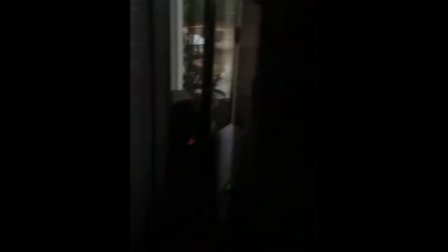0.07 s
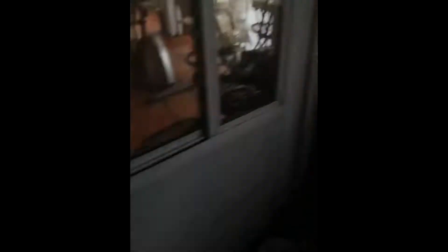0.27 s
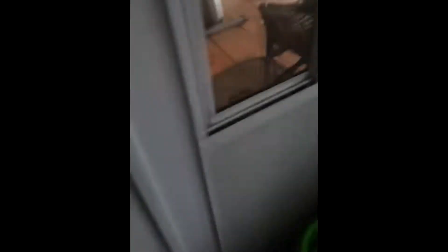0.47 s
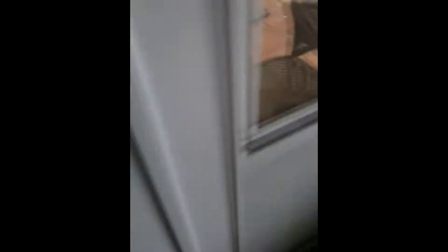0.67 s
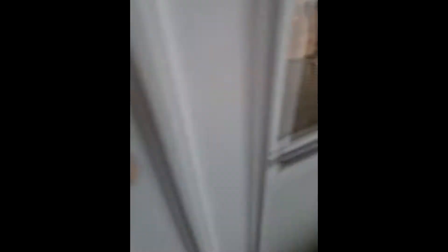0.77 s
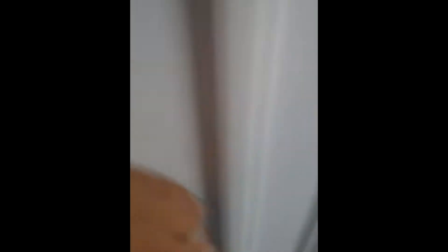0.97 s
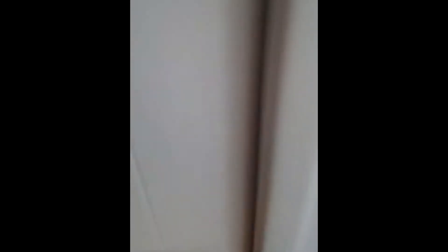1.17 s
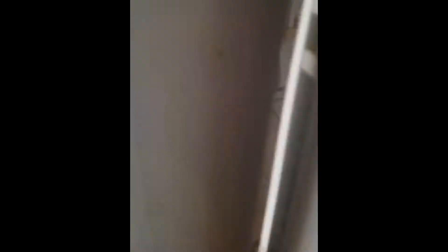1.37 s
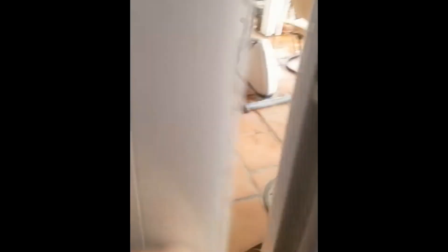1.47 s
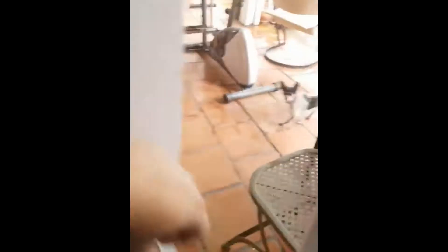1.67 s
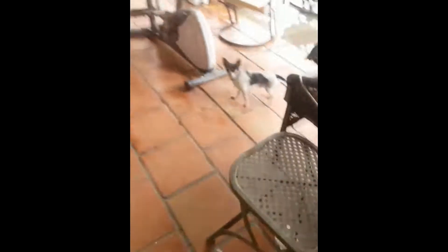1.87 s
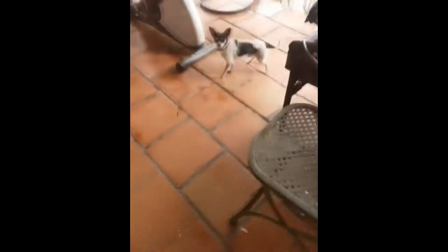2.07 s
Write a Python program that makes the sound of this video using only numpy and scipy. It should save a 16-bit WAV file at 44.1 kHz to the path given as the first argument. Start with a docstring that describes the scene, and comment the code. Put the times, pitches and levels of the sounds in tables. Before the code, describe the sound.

Sliding glass door rattles, knocks loose and scrapes open, air thumping the close phone microphone

```python
"""A faint room tone and low rumble come first, with one soft puff; both rumble and tone last throughout.
Light clicks of a door's metal latch (filtered chatter plus decaying modes) follow, then knocks in the leaf.
The knocks peak near 1 s as the door frees and slides off with a scrape (shaped noise) and louder rumble.
Puffs of displaced air (short pressure swings trailing noisy eddies) then thump the microphone of a phone.
Sparse clicks and knocks follow, and a last soft puff; a small room answers every click and knock."""
import sys
import numpy as np
from scipy import signal
from scipy.fft import rfft, irfft, next_fast_len
from scipy.io import wavfile
from scipy.ndimage import map_coordinates

SR = 44100
rng = np.random.default_rng(int(sys.argv[2]) if len(sys.argv) > 2 else 0)


def unload_audio(sound):
    """Save the sound as a 16-bit wav file, at the path given as the first command line argument."""
    columns = np.transpose(np.atleast_2d(sound))
    # keep every value between -1 and 1, then stretch to whole-number steps
    steps = np.round(np.clip(columns, -1, 1) * 32767)
    wavfile.write(sys.argv[1], SR, steps.astype(np.int16))


N = 92874
TIME_S = np.arange(N) / SR


def amp(db):
    """Level law: 20 dB is a factor of ten in amplitude."""
    return 10 ** (np.asarray(db) / 20)


def along(points, hz):
    """Logarithmic frequency scale: interpolate (hz, value) points along it."""
    point_hz, value = np.transpose(points)
    return np.interp(np.log(hz + 1), np.log(point_hz + 1), value)


def closed(points, hz):
    """Band limitation: a spectrum in dB that falls 14 dB per octave beyond its end points."""
    octaves_below = np.log2(np.maximum(points[0][0] / (hz + 1), 1))
    octaves_above = np.log2(np.maximum((hz + 1) / points[-1][0], 1))
    return along(points, hz) - 14 * (octaves_below + octaves_above)


def curves(rows):
    """Level envelopes: one value per sample for each column after the time."""
    point_s, *columns = np.transpose(rows)
    return [np.interp(TIME_S, point_s, column) for column in columns]


def wobble(rate):
    """Slow random modulation: a smooth curve through `rate` random knots a second."""
    knots = rng.standard_normal(int(N * rate / SR) + 4)
    return map_coordinates(knots, [np.arange(N) * rate / SR])


def coloured(x, db_of_hz):
    """Minimum-phase filtering: folding the cepstrum makes the wanted gain causal."""
    size = next_fast_len(2 * len(x))
    gain = amp(db_of_hz(np.fft.rfftfreq(size, 1 / SR)))
    cepstrum = irfft(np.log(gain + 1e-6), size)
    cepstrum[1:size // 2] *= 2
    cepstrum[size // 2 + 1:] = 0
    return irfft(rfft(x, size) * np.exp(rfft(cepstrum)), size)[:len(x)]


def rush(tone, lumpy_db, rate):
    """Turbulent or frictional noise: random pressure in uneven lumps, coloured and set to rms 1."""
    lumps = rng.standard_normal(N) * amp(lumpy_db * wobble(rate))
    noise = coloured(lumps, lambda hz: closed(tone, hz))
    return noise / np.sqrt(np.mean(noise ** 2) + 1e-20)


# spectrum of the quiet room tone: pitch_hz [Hz], density_db [relative dB per Hz]
HUM_TONE = [(150, -30), (250, -17), (321, -24.5), (522, -13), (632, -20), (927, -7.5), (1030, -20),
            (1460, -13), (1650, -28), (1770, -3), (1930, -4.5), (2020, -14.5), (8430, -35), (11000, -71.5),
            (18500, -120)]


def room_hum():
    """Stationary background noise: a quiet coloured hiss and hum at a steady mean level."""
    return amp(-64.5) * rush(HUM_TONE, lumpy_db=1.6, rate=16)


# reverberation of the small room: pitch_hz [Hz], t60_s [s]
ROOM_DECAY = [(200, 0.3), (1000, 0.52), (4000, 0.14), (8000, 0.18)]


def room(x):
    """Reverberation: each frequency of a diffuse noise tail dies at its own speed."""
    hz, t, bands = signal.stft(rng.standard_normal(SR // 2), SR, nperseg=256)
    decay = amp(-60 * t / along(ROOM_DECAY, hz)[:, None])
    tail = signal.istft(bands * decay, SR, nperseg=256)[1]
    delayed = np.pad(x, (200, 0))  # samples before the first reflection
    return signal.fftconvolve(delayed, tail / np.linalg.norm(tail))[:N]


# puffs of air on the microphone: centre_s [s], level_db [dB, of the swing before its envelope],
# length_ms [ms, one full swing]
PUFFS = [(0.129, -39, 15), (1.236, -18, 3.5), (1.2886, -1.5, 4.6), (1.297, -3, 2.24), (1.303, -7, 3),
         (1.3072, -2.5, 4.6), (1.314, -2.5, 2.5), (1.326, -10, 3), (1.3292, -9, 6.7), (1.346, -8, 3),
         (1.351, -9, 5.2), (1.369, -11, 8.1), (1.377, -12.5, 7), (1.398, -13.5, 6.3), (1.556, -12, 6.8),
         (1.565, -14, 7.9), (1.599, -17.5, 8.8), (1.61, -15.5, 3.6), (1.62, -27, 3.3), (1.647, -22, 4.4),
         (2.079, -32.5, 14.6)]
# spectrum of the eddies behind a puff: pitch_hz [Hz], density_db [relative dB per Hz]
SWIRL_TONE = [(60, -32), (150, 10), (350, -3.5), (800, -11.5), (1500, -14.5), (3000, -53)]


def puffs():
    """Air displacement: each puff pushes the diaphragm, pulls it back and sheds turbulent eddies."""
    swirl_db = -18  # relative to the level of the puff
    swirl_lengths = 0.71  # decay constant of the eddies' power, in puff lengths
    rebound = 1.79  # stretches the dying side of the envelope
    push, eddy_power = np.zeros(N), np.zeros(N)
    for centre_s, level_db, length_ms in PUFFS:
        u = (TIME_S - centre_s) / (length_ms / 1000)  # time in puff lengths
        width = np.where(u < -0.2, 0.3, 0.29 * rebound)
        envelope = np.exp(-abs((u + 0.2) / width) ** 1.57)
        push -= amp(level_db) * np.sin(2 * np.pi * u) * envelope
        eddy_power += amp(2 * level_db) * np.clip(u + 0.5, 0, 1) * np.exp(-abs(u) / swirl_lengths)
    return push + amp(swirl_db) * np.sqrt(eddy_power) * rush(SWIRL_TONE, lumpy_db=6.4, rate=150)


# rubbing noise before the 2.5 dB cut of the scrape: time_s [s], scrape_db [dB], treble_hiss_db [dB]
SCRAPE = [(0.27, -75, -107), (0.29, -55.5, -81), (0.354, -45.5, -67.5), (0.446, -56, -65),
          (0.496, -49.5, -70), (0.642, -53, -68.5), (0.865, -54, -85), (0.99, -32, -59), (1.03, -28, -48),
          (1.132, -45.5, -68.5), (1.322, -43.5, -64.5), (1.418, -43, -60), (1.5, -41, -54.5),
          (1.57, -38, -56.5), (1.786, -54, -64), (2.08, -51, -68)]
# low rolling noise before its 2 dB cut: time_s [s], level_db [dB]
RUMBLE = [(0.14, -56), (0.194, -58.5), (0.516, -52), (0.62, -59), (0.646, -42), (0.7, -55.5), (0.81, -56.5),
          (0.95, -50), (1.04, -35), (1.088, -29), (1.166, -35), (1.214, -39), (1.236, -27), (1.264, -33.5),
          (1.28, -25.5), (1.295, -14), (1.384, -30), (1.428, -35.5), (1.526, -33), (1.558, -31.5),
          (1.624, -28.5), (1.712, -44.5), (1.82, -41), (1.914, -47), (2.1, -52.5)]
# their three spectra: pitch_hz [Hz], density_db [relative dB per Hz]
SCRAPE_TONE = [(150, -24), (250, -6.5), (451, -11.5), (498, -33), (572, -6), (624, -10), (726, -17.5),
               (1680, -16), (5000, -29.5), (6500, -52.5), (11000, -120)]
HISS_TONE = [(2500, 3.1), (4500, 9), (7000, 14), (8600, 5)]
RUMBLE_TONE = [(12, -54), (20, 1), (60, 1.5), (135, 7), (238, 1), (288, -12.5), (414, -18.5), (474, -15.5),
               (500, -4.5), (650, -25.5), (1100, -120)]


def slide():
    """Sliding and rolling friction of hand, seal and rollers: a scrape, its treble hiss and a low rumble."""
    scrape_db, hiss_db = curves(SCRAPE)
    rumble_db, = curves(RUMBLE)
    touch = np.clip((TIME_S - 0.25) / 0.03, 0, 1)  # rubbing fades in
    scrape = amp(scrape_db - 2.5) * rush(SCRAPE_TONE, lumpy_db=2.6, rate=120)
    hiss = amp(hiss_db) * rush(HISS_TONE, lumpy_db=2.6, rate=190)
    rumble = amp(rumble_db - 2) * rush(RUMBLE_TONE, lumpy_db=0.47, rate=40.6)
    return touch * (scrape + hiss) + rumble


def strikes(rows, modes, body, pivot_hz, ring_db, crack_db, grain_db):
    """Impact excitation: each blow is a crack, grainy chatter in the body's colour, and ringing modes."""
    favour_db, favour_oct = 11, 0.22  # the spot struck favours the band round one pitch
    out, t = np.zeros(N + SR), np.arange(SR // 4) / SR
    mode_hz, mode_db, mode_t60 = np.transpose(modes)
    for start_s, level_db, tilt, t60, spot_hz in rows:
        def lean(hz):
            favoured = np.exp(-(np.log2((hz + 1) / spot_hz) / favour_oct) ** 2)
            return tilt * np.log2((hz + 50) / pivot_hz) + favour_db * favoured

        noise = rng.standard_normal(len(t))
        noise[0] += amp(crack_db)
        grain = np.repeat(rng.standard_normal(len(t) // 32 + 1), 32)[:len(t)]
        onset_db = 7.15 * np.exp(-t / 0.0025)
        envelope = amp(-60 * t / t60 + onset_db + grain_db * grain)
        chatter = coloured(noise * envelope, lambda hz: closed(body, hz) + lean(hz))

        # every blow varies the modes; a short blow also shortens their ringing
        level_pick, pitch_pick = rng.standard_normal((2, len(mode_hz)))
        life = np.minimum(mode_t60, 2.22 * t60) * amp(1.5 * pitch_pick)
        mode_amp = amp(mode_db + lean(mode_hz) + 3 * level_pick)
        ring_hz = mode_hz * (1 + 0.006 * pitch_pick)
        decay = amp(-60 * t / life[:, None])
        ring = (mode_amp[:, None] * decay * np.sin(2 * np.pi * ring_hz[:, None] * t)).sum(0)

        hit = chatter / abs(chatter).max() + amp(ring_db) * ring / abs(ring).max()
        out[round(start_s * SR):][:len(t)] += amp(level_db) * hit / abs(hit).max()
    return out[:N]


# knocks in the door leaf: start_s [s], level_db [peak dB], tilt [dB per octave],
# t60_s [s, chatter], pitch_hz [Hz, favoured]
KNOCKS = [(.305,-32.5,4,0.22,1940), (.311,-29,2.5,0.34,834), (.326,-30.5,1.5,0.1,1130),
          (.343,-28,1,0.17,1000), (.421,-33,-5,0.17,860), (.457,-34.5,1,0.081,840),
          (.4965,-32,-7.5,0.095,540), (.508,-40.5,1.5,0.11,850), (.535,-33.5,3.5,0.23,800),
          (.65,-38,-3.5,0.16,292), (.822,-34,3,0.42,530), (.88,-27.5,-1.5,0.29,794),
          (.926,-25.5,-1.5,.14,810), (.947,-18.5,1.5,0.12,570), (.991,-24,3.5,0.17,865),
          (.999,-21,0.5,0.21,570), (1.0213,-7.5,-1,.09,565), (1.032,-13.5,1.5,0.17,920),
          (1.0805,-17,-1,0.057,542), (1.091,-24,-4,0.087,322), (1.124,-25,-3.5,0.22,505),
          (1.145,-22,-3.5,.08,810), (1.207,-21,-3,.1,745), (1.234,-25.5,-2.5,0.14,406),
          (1.296,-19,-6,0.076,768), (1.305,-17.5,-4.5,0.067,630), (1.345,-26.5,-6.5,0.035,530),
          (1.435,-34,6,0.11,842), (1.477,-28,3,0.091,1300), (1.4965,-16.5,1,0.068,1750),
          (1.502,-17.5,-0.5,0.1,1310), (1.509,-29,2.5,0.098,1070), (1.531,-25,1.5,0.24,1080),
          (1.584,-25,-2.5,0.06,864), (1.617,-26,5,0.088,384), (1.677,-31,-9.5,0.059,650),
          (1.742,-34,-2.5,0.25,288), (1.755,-32.5,-1,0.19,660), (1.822,-37,-5,0.18,316),
          (2.0002,-32.5,10,0.064,1600), (2.007,-34.5,5.5,0.1,1590), (2.034,-40,-1,0.13,537),
          (2.044,-47.5,-2,0.14,1100)]
# leaf modes, before each blow's variation: pitch_hz [Hz], level_db [relative dB], t60_s [s]
LEAF_MODES = [(343, 1.5, 0.069), (440, -12.5, 0.12), (563.5, -5, .13), (796.7, 8.5, 0.1), (861, -8.5, .29),
              (951, -9, .3), (1098, -14.5, 0.21), (1328, 2.5, 0.057), (1545, -5.5, 0.17), (1840, -6, 0.12),
              (2036, -35, 0.079)]
# colour of the leaf's chatter: pitch_hz [Hz], gain_db [relative dB]
LEAF_BODY = [(120, -32), (200, -7), (532, -3), (683, -9), (946, -5.5), (1840, -12.5), (3710, -27.5),
             (4000, -38), (5200, -64), (8800, -120)]


def leaf_knocks():
    """Plate vibration: blows to the broad door leaf excite its low, damped modes."""
    return strikes(KNOCKS, LEAF_MODES, LEAF_BODY, pivot_hz=800, ring_db=-5.0, crack_db=13.5, grain_db=4.0)


# clicks of metal latch and handle: start_s [s], level_db [peak dB], tilt [dB per octave],
# t60_s [s, chatter], pitch_hz [Hz, favoured]
CLICKS = [(.2637,-43,-12.5,.069,1760), (.304,-30.5,0.5,0.089,1910), (.3236,-24,1.5,0.091,5260),
          (.4206,-24,-7,0.063,2930), (.4344,-27,-4.5,0.11,2000), (.533,-41,-3.5,0.051,5700),
          (.5925,-36.5,-2.5,0.067,7000), (.6434,-40,-3,0.28,2400), (.652,-41,-2.5,0.17,7360),
          (.8167,-37.5,-1.5,0.046,5500), (.823,-31,2,0.099,3010), (.8375,-30.5,-5,0.084,5670),
          (.8785,-25.5,1.5,0.053,1660), (.8875,-16,2.5,0.043,3700), (.8935,-24,-0.5,0.045,4250),
          (.9265,-17,10,.09,2900), (.942,-18.5,0.5,0.04,4500), (.9998,-22.5,11.5,0.16,3070),
          (1.089,-22.5,-4,0.047,2100), (1.1448,-18.5,-4,0.033,4340), (1.1533,-34.5,3,0.037,2840),
          (1.2352,-33,-7.5,.06,6020), (1.273,-34,-4.5,.055,1730), (1.3495,-30.5,1.5,0.26,7180),
          (1.478,-32,-2,.07,2770), (1.483,-24,-3.5,.06,4300), (1.527,-23.5,11.5,.08,2700),
          (1.582,-33,-7.5,0.12,2290), (1.588,-42,-7.5,0.074,3650), (1.601,-35.5,2,0.044,3400),
          (1.6408,-33.5,7,0.4,7000), (1.6731,-36,7,0.072,4600), (1.7368,-45.5,6.5,.07,3090),
          (1.751,-36,2.5,0.12,2370), (1.756,-45,-7,.06,3500), (1.86,-47,-1,.079,2260),
          (2.0002,-34.5,2,0.13,2860)]
# latch modes, before each blow's variation: pitch_hz [Hz], level_db [relative dB], t60_s [s]
LATCH_MODES = [(1921, -9.5, 0.19), (2454, -3.5, 0.089), (2967, 4, 0.063), (3300, -6, 0.023),
               (3467, 2, 0.15), (4183, -6, 0.058), (4410, 0, .077), (4610, -5, 0.16), (5410, -7.5, 0.034),
               (6050, -4, 0.027), (6570, -3, 0.045)]
# colour of the latch's chatter: pitch_hz [Hz], gain_db [relative dB]
LATCH_BODY = [(410, -41.5), (700, -19), (810, -0.5), (977, 1), (2000, -3.5), (2250, 1.5), (3520, -5),
              (8430, -15.5), (11000, -20), (12800, -33.5), (14000, -15.5), (16000, -38.5)]


def latch_clicks():
    """Small-body resonance: blows to the light metal latch excite its high modes."""
    return strikes(CLICKS, LATCH_MODES, LATCH_BODY, pivot_hz=3540, ring_db=-7.5, crack_db=6.5, grain_db=3)


def scene():
    """Superposition: the pressures of all the sources add, and the room answers the door."""
    door = latch_clicks() + leaf_knocks()
    reflected = amp(-9.5) * room(door)
    return (door + reflected + puffs() + slide() + room_hum())[None]


def record(dry):
    """Band limits: sound opens late, the microphone rolls off deep bass, lossy audio coding dims the top treble."""
    start_s, open_s = 0.116, 0.00075  # silence before, then a quick fade in
    # lossy coding: dimmed above 8600 Hz, nothing from 15800 Hz up
    shelf_hz, shelf_db, top_hz = 8600, -27.5, 15800
    opened = dry * np.clip((TIME_S - start_s) / open_s, 0, 1)
    hz = np.fft.rfftfreq(N, 1 / SR)
    bass_cut = (1j * hz / (1j * hz + 42)) ** 3  # three first-order stages at 42 Hz
    treble = (hz < top_hz) * np.where(hz < shelf_hz, 1, amp(shelf_db))
    heard = irfft(rfft(opened) * treble * bass_cut, N)
    return heard * (np.arange(N) > (start_s - 0.002) * SR)  # no filter ringing ahead of the opening


dry = scene()
out = record(dry)
unload_audio(out)
```